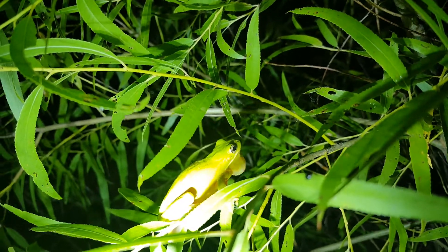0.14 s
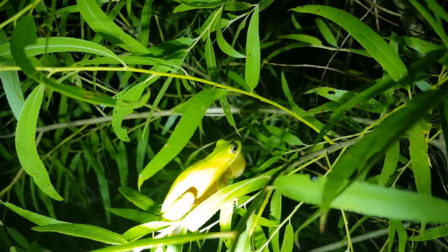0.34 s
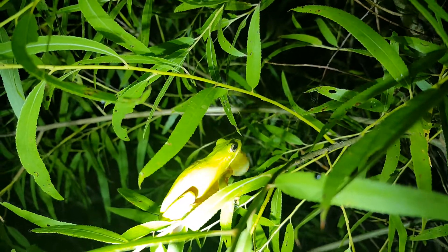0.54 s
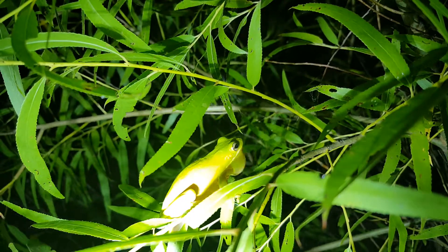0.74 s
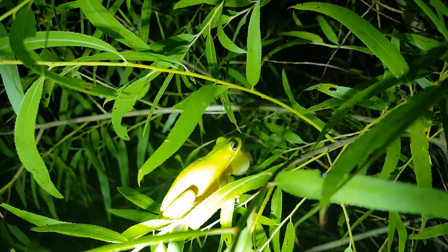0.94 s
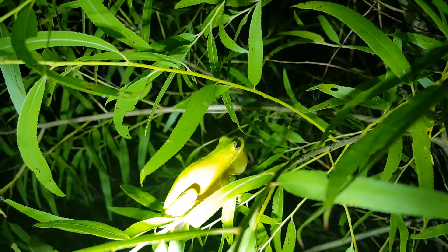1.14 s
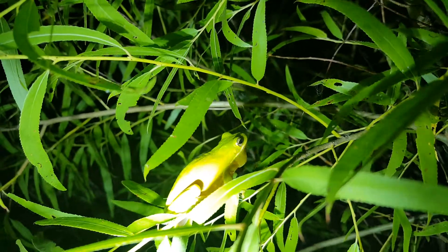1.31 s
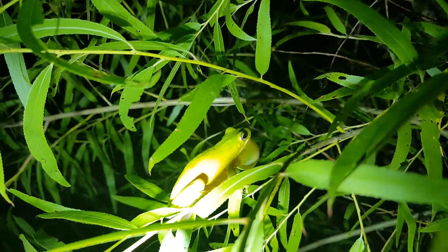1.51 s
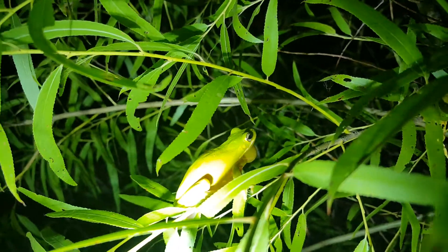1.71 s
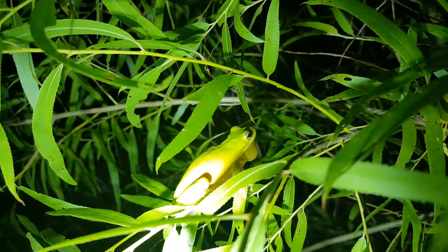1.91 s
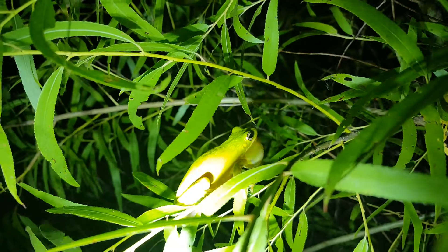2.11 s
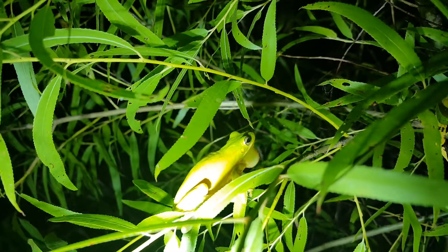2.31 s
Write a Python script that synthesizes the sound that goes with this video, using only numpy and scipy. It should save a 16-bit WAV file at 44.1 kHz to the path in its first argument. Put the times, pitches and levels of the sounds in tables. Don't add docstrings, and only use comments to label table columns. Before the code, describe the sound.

A small tree frog close by gives five loud, dry, rattling croaks, evenly spaced until a longer gap before the last, with very faint distant frogs and insects in open night air; close microphone, frog toward the left.

```python
import sys
import numpy as np
from scipy import signal
from scipy.io import wavfile

SR = 44100
rng = np.random.default_rng(int(sys.argv[2]) if len(sys.argv) > 2 else 0)


def volts(x):
    e = np.asarray(x, float) / 20
    return 10 ** e


def persist_wave(psi):
    counts = np.round(np.clip(psi, -1, 1) * 32767).astype(np.int16)
    wavfile.write(sys.argv[1], SR, np.atleast_2d(counts).T)


N = 103635
CROAK_N = 7000
SNAP_SPREAD_DB = 1.0
SAC_PAN_DB = 10


def band(x, low_hz, high_hz, order=2):
    return signal.sosfilt(signal.butter(order, [low_hz, high_hz], "band", fs=SR, output="sos"), x)


def band_around(x, mid_hz, width_hz):
    return rms_one(band(x, mid_hz - width_hz / 2, mid_hz + width_hz / 2))


def low_pass(x, cut_hz, order):
    return signal.sosfilt(signal.butter(order, cut_hz, fs=SR, output="sos"), x)


def rms_one(x):
    return x / np.sqrt(np.mean(x ** 2) + 1e-20)


def sides(pan_db):
    return volts(np.array([[.5], [-.5]]) * pan_db)


def noise(alike=0.31):
    mid, side = rng.standard_normal((2, N))
    return np.sqrt(1 + alike) * mid + np.sqrt(1 - alike) * side * [[1], [-1]]


def drift(rate):
    points = rng.standard_normal(400)
    return np.interp(np.arange(N) / SR * rate, np.arange(400), points)


# (first snap [s], last snap [s], level [dB], sac pitch [Hz])
CROAK_TIMES = [
    (.2220, .3140, -8, 876),
    (.6138, .7066, -8, 879.7),
    (1.0108, 1.1090, -8.5, 881.3),
    (1.4190, 1.5148, -8.5, 883.3),
    (2.0062, 2.0782, -8, 879.6),
]
# (delay [s], level [dB])
LEAF_ECHOES = [(.0061, -20), (.0113, -29.5), (.019, -30.5)]


def near_frog():
    x = frogs(CROAK_TIMES, steady_s=.024)
    echoes = sum(volts(db) * np.roll(x, int(s * SR), axis=1) for s, db in LEAF_ECHOES)
    return x + echoes


def frogs(rows, steady_s):
    out = np.zeros((2, N + 2 * SR))
    for row in rows:
        out = croak(out, *row, steady_s)
    low_cut = signal.butter(6, 761, "high", fs=SR, output="sos")
    return signal.sosfilt(low_cut, out)[:, SR:SR + N]


def croak(out, first, last, level_db, hz, steady_s):
    right_lag, dull_s = 4.36, 0.014
    rise_s, slow_rise_s = 0.00015, 0.001
    s, db = snaps(first, last, hz, steady_s)
    i0 = int((first - .02) * SR)
    ear_lag = np.array([0, right_lag / SR])[:, None, None]
    t = (i0 + np.arange(CROAK_N)) / SR - ear_lag - s[:, None]
    age = np.maximum(t, 0)
    u = np.clip((s - first) / (last - first), 0, 1)[:, None]
    early = np.exp(-u * (last - first) / dull_s)
    rise = 1 - np.exp(-(age / (rise_s + slow_rise_s * early)) ** 2)
    size = volts(db + level_db)[:, None] * rise
    x = sac_ring(hz, age, u, size)
    x = x + mouth_and_body_ring(s, age, u, early, size)
    x = x + slack_sac_ring(age, size * (s[:, None] > last))
    x = low_pass(x, 7030, order=6) + air_puffs(age, u, early, size)
    out = out.copy()
    out[:, SR + i0:SR + i0 + CROAK_N] += x
    return out


def snaps(first, last, hz, steady_s):
    steady_gap = 3
    pace_bend = 0.02
    cycles = round((last - first) * hz)
    luck = rng.random(60)
    gaps = np.where(luck < .3, 2, np.where(luck > .7, 4, 3))
    steady = cycles - steady_gap * np.arange(int(steady_s * hz / steady_gap) + 1)[::-1]
    start = np.cumsum([0, 6.5, 5.5, 4, *gaps])
    u = np.r_[start[start <= steady[0] - 2], steady] / cycles
    s = first + (last - first) * (u + pace_bend * u * (1 - u) * (1 - 2 * u))
    db = -13 * np.exp(-(s - first) / .007) - 3 * u
    db[-1] -= 4
    k = np.arange(1, 6)
    tail = last + .0026 * (k + rng.uniform(-0.273, 0.306, 5))
    tick_s, tick_db = first - .0058, -26
    db = np.r_[tick_db, db, -14 - 2 * k]
    return np.r_[tick_s, s, tail], db + SNAP_SPREAD_DB * rng.standard_normal(80)[:len(db)]


def sac_ring(hz, age, u, size):
    start_db, end_db, t60_s = -4, -18, 0.033
    ring = volts(start_db + (end_db - start_db) * u - 60 * age / t60_s)
    return sides(SAC_PAN_DB) * np.sum(size * ring * np.sin(2 * np.pi * hz * age), axis=1)


# (start pitch [Hz], end pitch [Hz], start level [dB], end level [dB], t60 [s],
# left over right [dB])
BODY_MODES = [(950, 1229, -4.5, -14, .016, 10.5), (1474, 1797, -10, -16, 0.011, 10),
              (2030, 2258, -11.5, -11, 0.0075, 17), (3280, 3700, -24, -36, 0.018, 13.5),
              (4200, 5200, -21.5, -30, 0.0046, 14.5), (5270, 2500, -40, -28.5, 0.0059, 12),
              (6080, 7300, -22, -21.5, 0.0058, 10), (6840, 6650, -15.5, -21.5, .014, 16)]


def mouth_and_body_ring(s, age, u, early, size):
    opening_share = 0.31
    pitch_spread, choke_s, dull_db_per_khz = 0.053, 0.00015, -0.5
    overdue = np.maximum(age - np.diff(s, append=9)[:, None], 0)
    choked = np.exp(-overdue / choke_s)
    luck = rng.standard_normal((14, 80, 1))[:, :len(s)]
    opened = (1 - np.exp(-u / opening_share)) / (1 - np.exp(-1 / opening_share))
    mouth = [(1888 * ratio, 2900 * ratio, db, db, 0.024, 6.5) for ratio, db in [(1, -1), (0.902, -5)]]
    x = 0
    for k, (start_hz, end_hz, start_db, end_db, t60_s, pan_db) in enumerate(mouth + BODY_MODES):
        mode_hz = start_hz + (end_hz - start_hz) * opened
        mode_hz = mode_hz * (1 + pitch_spread * (1 - opened) * luck[-1])
        gain_db = start_db + (end_db - start_db) * u + SNAP_SPREAD_DB * luck[k]
        gain_db = gain_db + dull_db_per_khz * early * mode_hz / 1000
        ring = size * choked * volts(gain_db - 60 * age / t60_s)
        x = x + sides(pan_db) * np.sum(ring * np.sin(2 * np.pi * mode_hz * age), axis=1)
    return x


# (pitch [Hz], level [dB], t60 [s])
SLACK_MODES = [(720, -3, 0.018), (1530, -2.5, .012)]


def slack_sac_ring(age, size):
    x = 0
    for mode_hz, gain_db, t60_s in SLACK_MODES:
        ring = size * volts(gain_db - 60 * age / t60_s)
        x = x + sides(SAC_PAN_DB) * np.sum(ring * np.sin(2 * np.pi * mode_hz * age), axis=1)
    return x


# (low edge [Hz], high edge [Hz], start level [dB], end level [dB], left over right [dB])
AIR_BANDS = [(990, 2920, -17.5, -24, 11.5), (4340, 6700, -32, -39.5, 17.5),
             (8000, 8500, -58.5, -56.5, -2.5), (9800, 21000, -51.5, -71, 11), (12300, 13200, -60, -49.5, 4),
             (13300, 14000, -55.5, -41, 5.5)]


def air_puffs(age, u, early, size):
    decay_s, dull_db_per_khz = 0.0022, -0.5
    x = 0
    for low_hz, high_hz, start_db, end_db, pan_db in AIR_BANDS:
        gain_db = start_db + (end_db - start_db) * u + dull_db_per_khz * early * low_hz / 1000
        gate = np.sum(size * volts(gain_db) * np.exp(-age / decay_s), axis=1)
        hiss = rms_one(band(rng.standard_normal(CROAK_N), low_hz, high_hz, order=3))
        x = x + sides(pan_db) * hiss * gate
    return x


def knock():
    age = np.arange(N) / SR - 2.0232
    push = np.exp(-(age / 0.00024) ** 2) * volts(-12)
    edge = (np.abs(age) < .5 / SR) * volts(-4.5)
    return (push + edge) * np.array([[1], [0]])


# (first snap [s], last snap [s], level [dB], sac pitch [Hz])
FAR_CROAKS = [(-.04, .05, -54.5, 874), (.335, .41, -52.5, 873), (.50, .585, -61.5, 813),
              (.73, .80, -50, 857), (1.13, 1.18, -54, 876), (1.215, 1.32, -55, 861), (1.54, 1.6, -54, 865),
              (1.67, 1.77, -55, 862), (1.86, 1.97, -55, 848), (2.1, 2.15, -52, 848), (2.2, 2.31, -53, 857),
              (2.29, 2.36, -57.5, 760)]


def far_frogs():
    x = low_pass(frogs(FAR_CROAKS, steady_s=0.099)[0], 2440, order=3)
    t60_s = 0.04
    smear = noise()[:, :6000] * volts(-60 * np.arange(6000) / SR / t60_s)
    smear /= np.sqrt(np.sum(smear ** 2) / 2)
    return sides(10.5) * signal.fftconvolve(x[None], smear)[:, :N]


# (centre [Hz], width [Hz], level [dB], throb rate [1/s], throb depth [dB],
# left over right [dB])
CHOIR_BANDS = [(1460, 2800, -70, 4, 2.5, 6), (2480, 450, -73, 4.6, 5, 8), (2820, 160, -66, 9, 2, 9),
               (3215, 390, -65.5, 17, -1.5, 14), (3735, 300, -72, 10, 4, 10.5),
               (4480, 650, -81, 6.5, 3, 19), (6700, 610, -71, 67, 0.5, 22.5),
               (14340, 3400, -75, 60, 1.5, 3.5), (5500, 1900, -79.5, 8.1, 5.5, 6.5)]


def choirs():
    out = volts(-80) * rms_one(band(noise(), 700, 1000))
    for mid_hz, width_hz, db, rate, depth_db, pan_db in CHOIR_BANDS:
        choir = band_around(noise(), mid_hz, width_hz)
        out += sides(pan_db) * volts(db + depth_db * drift(rate)) * choir
    return out


# (middle [s], level [dB])
CHIRP_TIMES = [(.11, -74.5), (.40, -73.5), (.87, -76), (1.319, -74), (1.70, -75), (2.0, -78.5),
               (2.22, -74.5)]


def crickets():
    t = np.arange(N) / SR
    gate = sum(volts(db) * np.exp(-((t - s) / 0.036) ** 4) for s, db in CHIRP_TIMES)
    return gate * sides(11.0) * band_around(noise(), 8840, 900)


def hum():
    return volts(-67 + 3.47 * drift(5)) * band_around(noise(.75), 128.1, 12.2)


# (frequency [Hz], level [dB per Hz])
NIGHT_AIR = [(15, -54.5), (25, -30), (49, 0), (134, -4.5), (162, -10.5), (213, -9), (650, -29), (840, -61),
             (1430, -120)]


def night_air():
    hz, db = np.transpose(NIGHT_AIR)
    edges = 20 * 2 ** np.arange(0, 5.6, .5)
    low = 0
    for a, b in zip(edges, edges[1:]):
        band_db = np.interp(np.log(a * b) / 2, np.log(hz), db) + 4.5 * drift(8.05)
        low = low + volts(band_db) * band(noise(.75), a, b)
    return volts(-60.5) * rms_one(low) * sides(2.5)


def scene():
    front = near_frog() + knock()
    return front + far_frogs() + choirs() + crickets() + hum() + night_air()


def band_limit(x):
    return signal.sosfilt(signal.butter(12, 16840, fs=SR, output="sos"), x)


def record(dry):
    knee = .7
    size = np.abs(dry)
    squashed = np.sign(dry) * (knee + .27 * np.tanh((size - knee) / 0.3))
    mix = np.where(size < knee, dry, squashed)
    top_cut = signal.cheby2(12, 60, 16500, fs=SR, output="sos")
    mix = signal.sosfilt(top_cut, mix)
    return band_limit(mix)


dry = scene()
out = record(dry)
persist_wave(out)
```